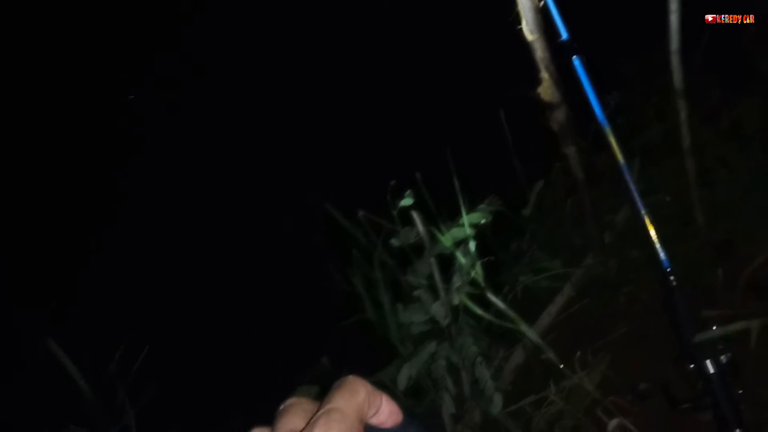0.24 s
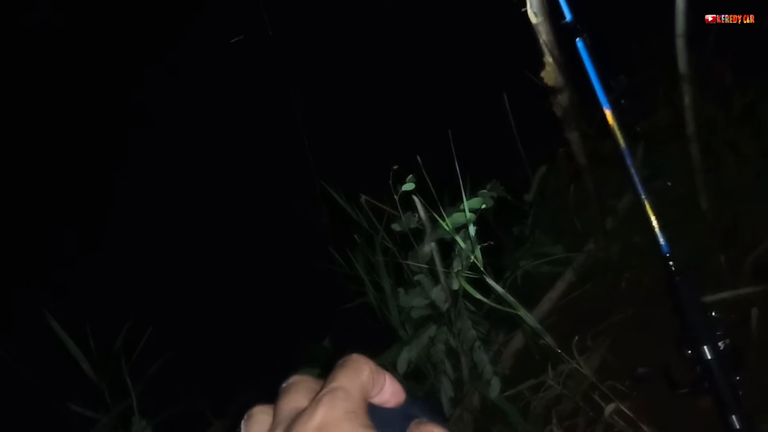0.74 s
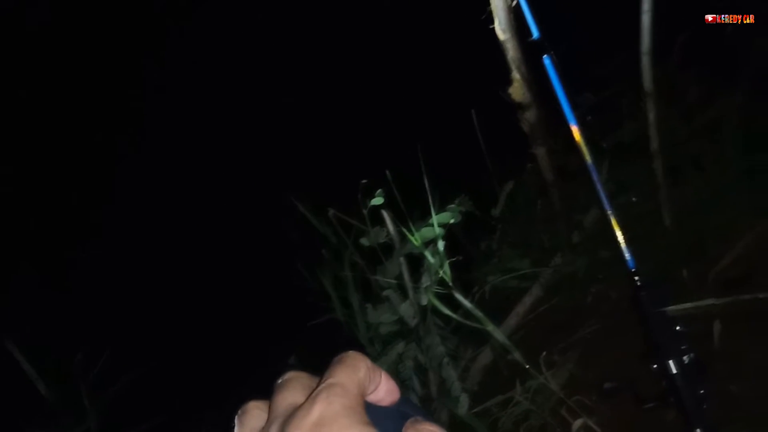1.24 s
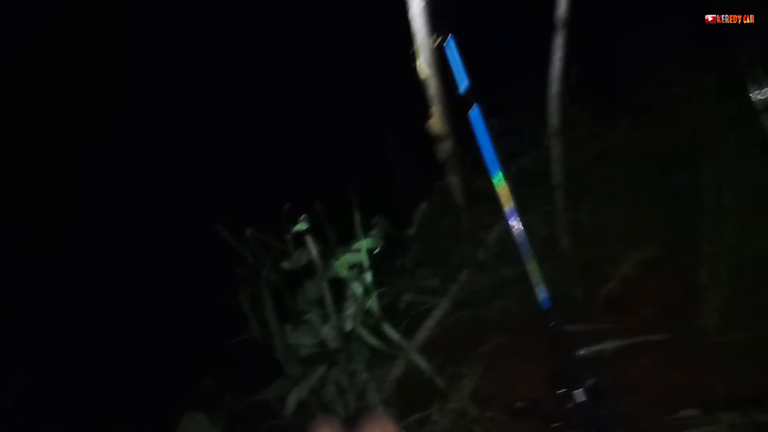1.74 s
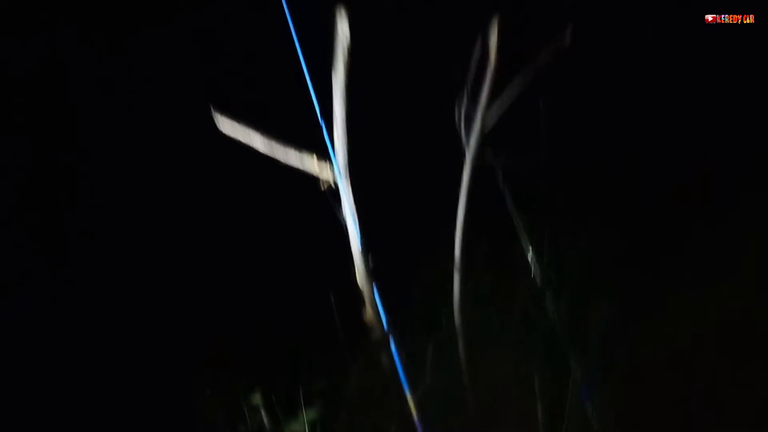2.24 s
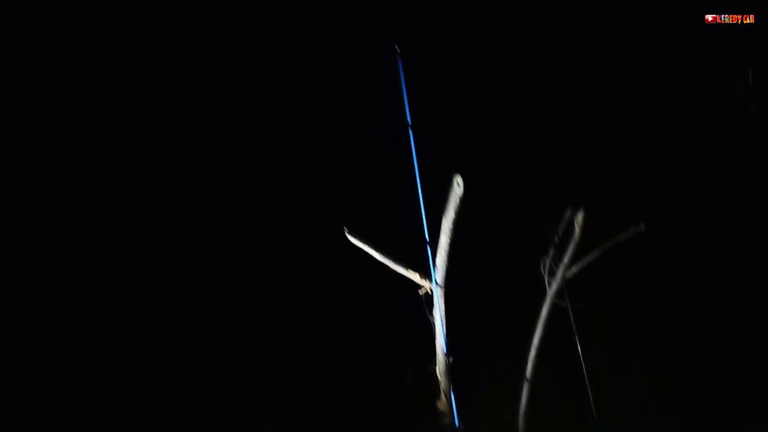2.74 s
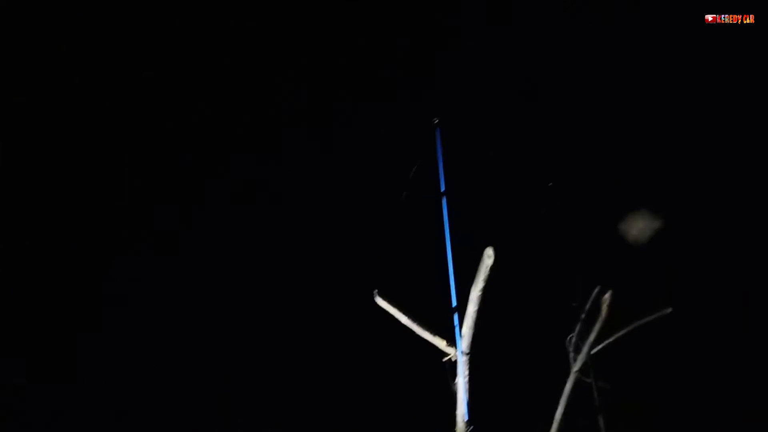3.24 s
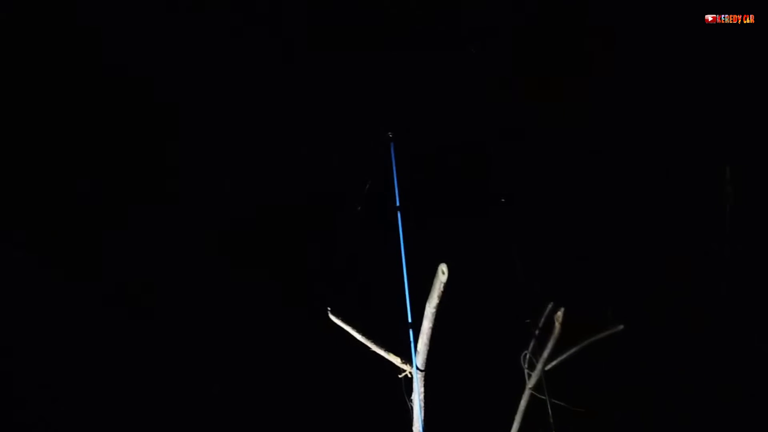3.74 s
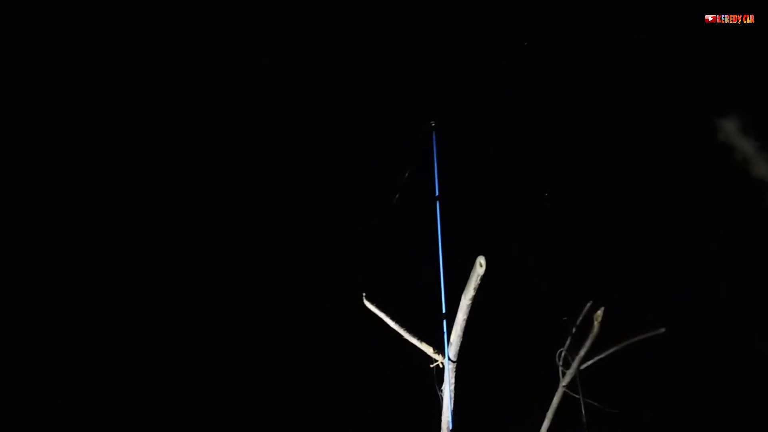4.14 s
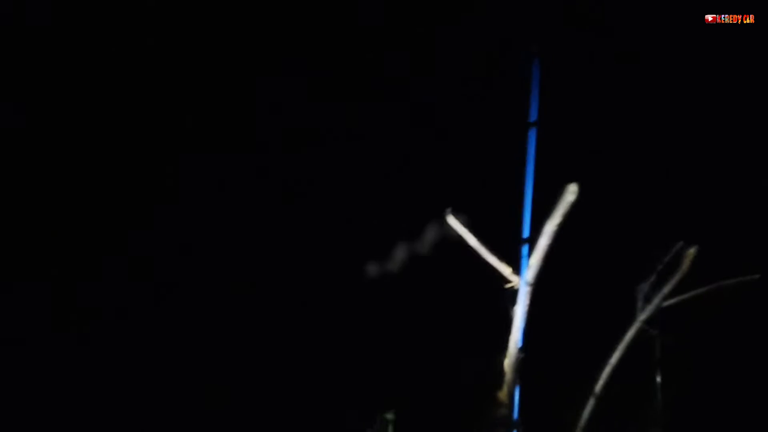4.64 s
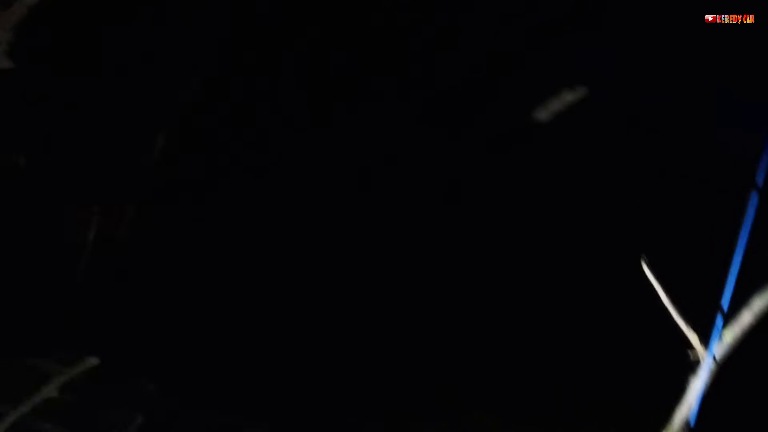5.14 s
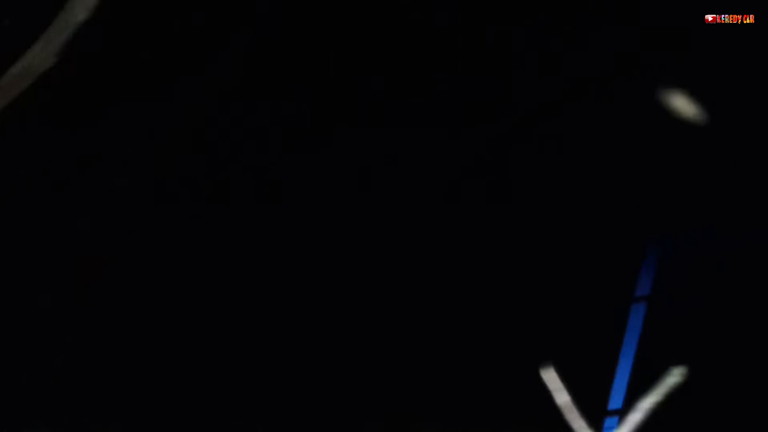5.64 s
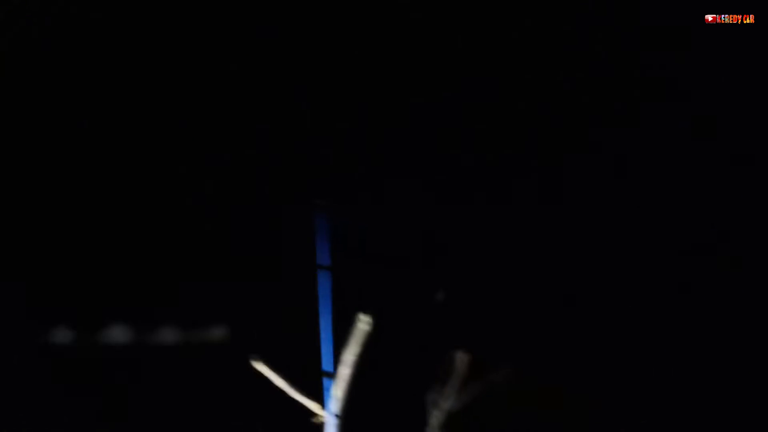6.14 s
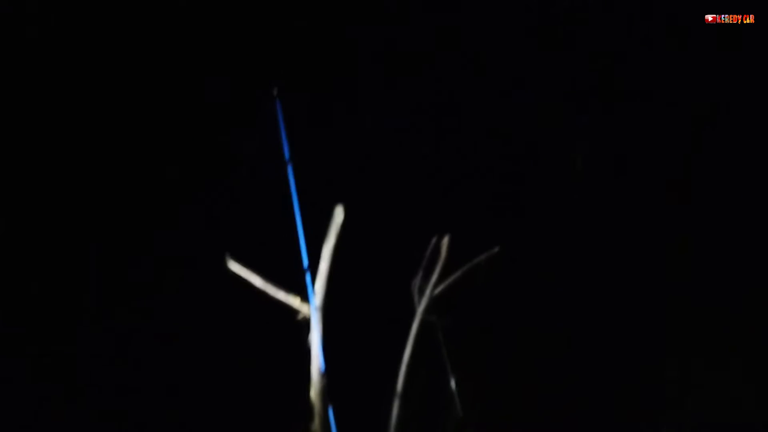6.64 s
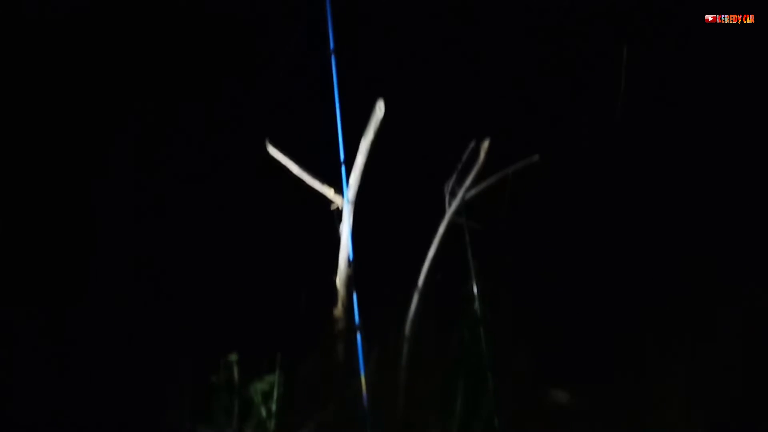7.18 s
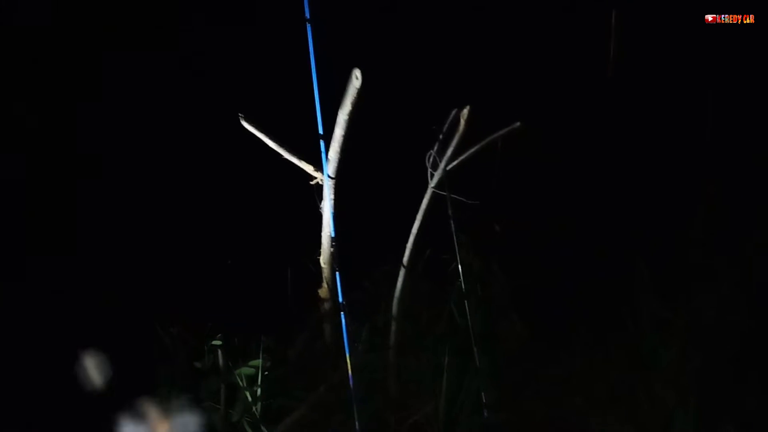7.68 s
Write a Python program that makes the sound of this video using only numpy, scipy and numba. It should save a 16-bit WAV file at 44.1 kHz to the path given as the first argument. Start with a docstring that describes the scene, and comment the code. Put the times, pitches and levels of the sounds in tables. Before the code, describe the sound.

A steady high insect chorus shimmers in the dark while one cricket trills fast; handled fishing gear clicks, rubs and thuds close to the microphone.

```python
"""Dense insect chorus on a riverbank at night; over it one tree cricket calls in two-stroke chirps.
Choirs are bands of noise throbbing at wing rate, swelling and fading as the listener turns the head.
The cricket is gliding sines with short bank echoes; a raspy neighbour is tooth strikes in a rising resonance.
Handling near the microphone: low bumps, noisy rubs, tonal squeaks, ringing clicks.
Rumble and hiss lie below; all is alike in both channels except one faint hiss."""
import sys
import numpy as np
from scipy import signal
from scipy.fft import rfft, irfft, next_fast_len
from scipy.io import wavfile
from numba import njit

SR = 44100
rng = np.random.default_rng(int(sys.argv[2]) if len(sys.argv) > 2 else 0)


def dump(signal):
    """Clip the signal to [-1, 1] and save it as 16-bit WAV at the path in sys.argv[1]."""
    limited = np.clip(np.atleast_2d(signal).T, -1, 1)
    pcm = np.round(limited * 32767).astype(np.int16)
    wavfile.write(sys.argv[1], SR, pcm)


N = 348831

# Choirs, low to high: (mean wing rate [1/s], throb depth [0-1], group flicker spread [dB])
CHOIR_WINGS = [(45, .2, 1.2), (47, .15, 1.5), (21.5, .25, 1.5), (120, .1, 1.6), (129, .2, 1.6),
               (326, .3, 1.6), (60, .05, 1.6)]
# Choir loudness, low to high: (facing level [dB], head-turned level [dB])
CHOIR_LEVELS = [(-82, -82.5), (-55, -64), (-58.5, -62.5), (-50.5, -55.5), (-55, -54.5), (-61, -65.5),
                (-79, -90)]
# Pitch borders of the choirs: (frequency [Hz])
CHOIR_BORDERS_HZ = [2000, 3600, 4500, 6100, 7200, 8400, 10800, 17000]
# Chorus spectrum before each choir is levelled: (frequency [Hz], relative density [dB])
CHORUS_SPECTRUM = [(2600, -57), (2850, -25), (3100, -27.5), (3650, -38.5), (3950, -11), (4250, -3),
                   (4600, -7), (5150, -13.5), (6150, -15.5), (6500, -5.5), (6850, 0), (7200, -5.5),
                   (8000, -9), (8700, -14.5), (9700, -16), (10800, -30.5), (13500, -52), (15000, -38),
                   (15450, -18.5), (15520, -68), (15900, -68)]
# Listener: (time [s], chorus swell [dB], head turn [0-1], change of the 8.4-10.8 kHz choir [dB])
LISTENER_MOVES = [(0, 0, 0.12, -1), (1.6, -1, 0.02, 0), (2.2, .5, 0, 0), (2.6, -1, 0, 1), (3.1, 1.5, 0, -1),
                  (3.9, -0.5, 0.06, 0.5), (4.8, 0.5, 0, -0.5), (5.3, 1.1, 0.1, -3), (5.4, -0.5, 0, -1.5),
                  (5.9, 1, 1, -3), (6.3, -0.5, 1, 2.5), (6.8, -1.5, 1, 3.5), (7.15, -1.5, 0.78, -3.5),
                  (7.91, -1.5, 0.8, -3)]
# Night rumble loudness: (time [s], median level [dB])
RUMBLE_LEVEL = [(0, -89), (.5, -84.5), (1.3, -90), (2.1, -85), (2.7, -90.5), (3.1, -84), (3.6, -89),
                (4.2, -85.5), (4.8, -88), (5.8, -87.5), (6.6, -83.5), (7.3, -83.5), (7.91, -84)]
# Rumble spectrum: (frequency [Hz], relative density [dB])
RUMBLE_SPECTRUM = [(12, -26), (20, 3), (27, -24), (47, -11.5), (64, -2), (200, -6.5), (260, -58),
                   (440, -120)]
# Microphone hiss spectrum: (frequency [Hz], relative density [dB])
HISS_SPECTRUM = [(120, -19), (200, -3.5), (350, -2.5), (460, -6.5), (800, -6.5), (1880, -9), (2500, -4),
                 (4000, -5), (15500, -12)]
# Spectrum of the hiss in opposite polarity: (frequency [Hz], relative density [dB])
OPPOSED_HISS_SPECTRUM = [(12, -37), (20, -13), (59, -1.5), (1130, -10), (2410, -7), (2690, -6), (3460, -14),
                         (3970, -25), (6030, -19), (6560, -51), (7750, -52), (8430, -19.5), (9960, 2.5),
                         (11400, -18), (15600, -8.5)]
# Tree cricket, runs of evenly spaced chirps: (first chirp [s], last chirp [s])
CRICKET_RUNS = [(0.005, 1.832), (1.898, 2.469), (2.552, 3.595), (3.665, 5.492), (5.55, 7.161),
                (7.211, 7.849)]
# Tree cricket loudness before stroke unevenness: (time [s], level [dB])
CRICKET_LEVEL = [(0, -65), (.45, -63), (1.0, -68), (1.4, -68), (1.6, -68.5), (1.8, -61), (2.0, -81),
                 (2.45, -70), (3.0, -67), (3.45, -71), (3.8, -78), (4.1, -76.5), (4.5, -68.5), (4.95, -93),
                 (5.2, -72), (5.5, -85), (5.6, -62), (5.92, -63), (6.1, -52), (6.95, -52.5), (7.2, -55.5),
                 (7.91, -54.5)]
# Echoes off the bank: (delay [s], gain [dB])
BANK_ECHOES = [(0.012, -15), (0.024, -18.5), (.041, -17.5), (.063, -35)]
# Bumps against the microphone body: (centre time [s], peak level [dB], frequency [Hz], bell length [cycles])
BUMP_EVENTS = [(0.359, -67.5, 230, 6.0), (0.566, -73.5, 395, 8.4), (1.7333, -38, 292, 1.42),
               (1.7329, -41, 520, 1.5), (1.741, -55.5, 150, 1.4), (2.097, -68, 110, 1.1),
               (2.179, -39, 550, 1.35), (2.183, -52.5, 139, 2.6), (2.222, -65, 142, 3.9),
               (5.904, -46, 97, 1.8), (5.935, -36.5, 96.4, 2.4), (5.956, -45, 140, 2.1),
               (5.979, -47.5, 132, 5.1), (5.999, -50, 85, 3.2), (6.017, -48.5, 122, 0.7),
               (6.04, -38, 94.6, 1.94), (6.068, -56, 85, 3.2), (6.103, -43, 89, 2.6), (6.14, -66, 70, 1.8),
               (6.483, -40.5, 125, 1.6), (6.488, -48, 238, 2.9), (6.4928, -30.5, 114, 1.36),
               (6.512, -38, 118, 2.1), (6.525, -42, 79, 2.1), (6.525, -59, 246, 3.2), (6.552, -58, 70, 2.2),
               (6.659, -57.5, 87, 3.0), (6.992, -72, 84.6, 2.5), (7.876, -62.5, 125, 3.6)]
# Creaks, squeaks and tinks of strap and gear: (middle [s], level [dB], mean frequency [Hz], length [s])
SQUEAK_EVENTS = [(1.73, -68, 3270, 0.022), (1.758, -68, 920, 0.048), (2.056, -54.5, 11700, .024),
                 (2.068, -48, 12480, 0.025), (2.12, -70, 1810, 0.05), (2.195, -59.5, 1030, 0.043),
                 (2.231, -64, 1475, .083), (2.273, -73, 1510, .051), (2.46, -67, 2210, .06),
                 (2.46, -74, 1710, .12), (2.7, -79.5, 1360, .2), (2.742, -70.5, 2060, 0.1),
                 (3.043, -71, 1915, .079), (3.097, -71, 1975, 0.09), (4.463, -64.5, 2017, .058),
                 (4.471, -69, 1070, .025), (4.555, -71, 770, .045), (4.67, -75.5, 1730, 0.11),
                 (4.799, -68, 2080, .04), (4.831, -61, 2200, .021), (4.833, -61, 2835, 0.043),
                 (4.83, -69, 3280, .04), (4.852, -64, 2165, .05), (5.186, -73, 1400, .042),
                 (5.472, -70, 2020, 0.049), (5.962, -72, 2190, 0.099), (7.49, -71, 1635, .039),
                 (7.746, -66, 14700, .02), (7.858, -70, 14700, .024), (7.864, -55, 9600, 0.018)]
# Sleeve and strap rubs: (start [s], length [s], body level [dB], low level [dB], top level [dB])
RUB_EVENTS = [(1.723, 0.057, -78, -63.5, -80), (1.77, .07, -79, -82, -85), (2.308, 0.22, -78, -82, -78),
              (2.599, .28, -80, -88.5, -84), (2.961, 0.19, -79, -85.5, -79), (4.408, 0.31, -81.5, -89, -84),
              (4.754, .22, -75.5, -80, -86), (5.096, .2, -78.5, -82.5, -88), (5.416, .12, -84, -92, -79),
              (5.897, .25, -79.5, -79, -89), (6.284, 0.19, -80.5, -80, -84), (7.725, 0.053, -88, -81, -79),
              (7.838, 0.071, -81, -86, -77)]
# Long scrape around the loudest click: (time [s], body level [dB], low level [dB], top level [dB])
SCRAPE_LEVELS = [(2.04, -75, -93, -76), (2.06, -78, -82, -65), (2.12, -70, -79, -63),
                 (2.155, -55, -60, -62), (2.175, -49.5, -60, -61), (2.2, -60, -67, -61),
                 (2.23, -64, -70, -66), (2.275, -68.5, -75.5, -63)]
# Brighter cloth swishes: (start [s], length [s], level [dB])
SWISH_EVENTS = [(2.123, .14, -58.5), (6.297, .12, -59.5)]
# Dry gear clicks: (time [s], level [dB], ring frequency [Hz], ring t60 [s], crack re level [dB])
CLICK_EVENTS = [(2.1785, -38.5, 1790, 0.022, -2), (2.2, -45, 1370, 0.016, -9),
                (2.2205, -62, 1600, .011, -3), (4.473, -52, 2000, 0.013, -35),
                (4.813, -42.5, 2300, 0.0087, -27), (5.1738, -48.5, 2010, 0.026, -32)]
# Calls of the raspy neighbour: (start [s], length [s], mid-call level [dB])
RASP_CALLS = [(6.239, .2, -69), (6.46, 0.21, -66.5), (6.777, 0.22, -69), (6.996, .11, -74),
              (7.206, 0.068, -75), (7.417, .19, -72), (7.64, .12, -70), (7.78, 0.14, -71)]

BAND_PER_GROUP_HZ, OVERLAP_HZ = 130.3, 250
CRICKET_HZ, CRICKET_FALL_HZ = 2694, 34.4
CHIRP_PERIOD_S, STROKE_S, STROKE_GAP_S = .0702, .023, .025
# strokes grow uneven below the clear level
CLEAR_DB, UNEVEN_DB, UNEVEN_DB_PER_DB = -55, 1.23, .1347
FAR_CRICKETS_DB, FAR_POLE_WIDTH_HZ = -85, 90
HISS_DB, OPPOSED_HISS_DB = -75.5, -82
RASP_START_HZ, RASP_RISE_HZ_PER_S, TEETH_PER_S = 2833, 1000, 600
RUB_ATTACK_S, RUB_RELEASE_S, RUB_UNEVEN_DB, FIBRES_PER_S = .02, .04, 2, 7000
GLIDE_SHARE = .032  # largest offset of squeak pitch at either end
# faint creaks with each rub
FAINT_PER_RUB, FAINT_RE_BODY_DB, FAINT_MEAN_S = 3, 2, .06
FAINT_LOW_HZ, FAINT_HIGH_HZ = 1205, 2315
STOPBAND_HZ = 15700


def from_db(db):
    """Decibels to gain."""
    return 10 ** (np.asarray(db) / 20)


def rms_one(x):
    """Scale to unit rms."""
    return x / np.sqrt(np.mean(x ** 2) + 1e-30)


def in_time(rows):
    """Interpolate the columns of a time table at every sample."""
    time_s, *columns = np.transpose(rows)
    return [np.interp(np.arange(N) / SR, time_s, column) for column in columns]


def colour(points, size):
    """Gain on an FFT grid, log in frequency; -200 dB outside the table."""
    hz, db = np.transpose(points)
    grid_hz = np.arange(size // 2 + 1) * SR / size
    return from_db(np.interp(np.log(grid_hz + 1), np.log(hz), db, left=-200, right=-200))


def drift(pole_hz):
    """Slow random curve of unit rms: noise through a double one-pole low-pass."""
    step = 40  # samples per drawn value
    r = np.exp(-2 * np.pi * pole_hz * step / SR)
    draws = rng.standard_normal(N // step + 2002)
    slow = rms_one(signal.lfilter([1], [1, -2 * r, r * r], draws)[2000:])  # settled part
    return np.interp(np.arange(N) / step, np.arange(len(slow)), slow)


def noise(points):
    """Steady noise of a given spectrum, unit rms."""
    size = next_fast_len(N)
    spectrum = rfft(rng.standard_normal(size)) * colour(points, size)
    return rms_one(irfft(spectrum, size)[:N])


def band(low_hz, high_hz, x):
    """Band-pass to unit rms."""
    sos = signal.butter(2, [low_hz, high_hz], "band", fs=SR, output="sos")
    return rms_one(signal.sosfilt(sos, x))


def add(out, start_s, sound):
    """Mix in a sound, trimmed to the ends of the output."""
    i = round(start_s * SR)
    sound = sound[max(-i, 0):N - i]
    out[max(i, 0):max(i, 0) + len(sound)] += sound


@njit
def moving_resonance(x, hz, r, sr):
    """Two-pole resonance with moving centre."""
    y = np.zeros(len(x))
    for i in range(2, len(x)):
        y[i] = x[i] + 2 * r * np.cos(2 * np.pi * hz[i] / sr) * y[i - 1] - r * r * y[i - 2]
    return y


def resonance(x, hz, pole_width_hz):
    """Two moving resonances in series, unit rms."""
    r = np.exp(-np.pi * pole_width_hz / SR)
    once = moving_resonance(x, hz, r, float(SR))
    return rms_one(moving_resonance(once, hz, r, float(SR)))


def choir(song, low_hz, high_hz, wing_per_s, depth, flicker_db, groups=6):
    """Narrow bands side by side; interleaved groups flicker separately, all throb at the wing rate."""
    size = 2 * (len(song) - 1)
    hz = np.arange(len(song)) * SR / size
    rise, fall = [np.clip((hz - edge) / (2 * OVERLAP_HZ) + .5, 0, 1) for edge in (low_hz, high_hz)]
    share = song * np.sqrt(rise * (1 - fall))
    group = (hz // BAND_PER_GROUP_HZ) % groups
    phase = 2 * np.pi * wing_per_s * np.cumsum(1 + .0196 * drift(.504)) / SR
    crowd = np.zeros(N)
    for k in range(groups):
        voices = irfft(share * (group == k), size)[:N]
        crowd += from_db(flicker_db * drift(8.5)) * voices
    return rms_one(crowd * (1 + np.clip(depth, 0, 1) * np.sin(phase)))


def chorus():
    """Choirs of one song colour swell together and change unequally as the head turns."""
    size, out = 2 * next_fast_len(N // 2 + 1), np.zeros(N)
    swell_db, turn, treble_db = in_time(LISTENER_MOVES)
    turn = np.clip(turn, 0, 1)
    for k, (facing_db, turned_db) in enumerate(CHOIR_LEVELS):
        level_db = facing_db + swell_db + turn * (turned_db - facing_db)
        if k == 5:
            level_db = level_db + treble_db
        song = rfft(rng.standard_normal(size)) * colour(CHORUS_SPECTRUM, size)
        out += from_db(level_db) * choir(song, *CHOIR_BORDERS_HZ[k:k + 2], *CHOIR_WINGS[k])
    return out


def far_crickets():
    """Distant chirps merged: resonant noise, narrow and wavering, at the cricket's pitch."""
    tone = resonance(rng.standard_normal(N), np.full(N, float(CRICKET_HZ)), FAR_POLE_WIDTH_HZ)
    return from_db(FAR_CRICKETS_DB + 4.4 * drift(2.2)) * tone


def night_rumble():
    """Low coloured noise, wavering about a slow level curve."""
    level_db, = in_time(RUMBLE_LEVEL)
    return from_db(level_db + 2.1 * drift(2.48)) * noise(RUMBLE_SPECTRUM)


def microphone_hiss():
    """Coloured noise with slight level drift, common to both channels."""
    return from_db(HISS_DB + 1.0 * drift(11)) * noise(HISS_SPECTRUM)


def opposed_hiss():
    """Steady coloured noise, opposite in polarity between channels."""
    return from_db(OPPOSED_HISS_DB) * noise(OPPOSED_HISS_SPECTRUM) * [[1], [-1]]


def cricket():
    """Each wing stroke is a near sine sinking in pitch; the bank returns short echoes."""
    out, t = np.zeros(N), np.arange(round(STROKE_S * SR)) / SR
    runs = [np.linspace(a, b, round((b - a) / CHIRP_PERIOD_S) + 1) for a, b in CRICKET_RUNS]
    starts_s = np.concatenate(runs)
    cut_short = np.diff(starts_s, append=np.inf) < .8 * CHIRP_PERIOD_S  # one stroke only
    envelope = np.sin(np.pi * t / STROKE_S) ** .96
    for start_s, cut in zip(starts_s, cut_short):
        level_db = np.interp(start_s, *np.transpose(CRICKET_LEVEL))
        uneven_db = UNEVEN_DB + UNEVEN_DB_PER_DB * max(CLEAR_DB - level_db, 0)
        for k in range(2 - cut):
            pitch_luck, phase_luck, level_luck = rng.standard_normal(3)
            hz = CRICKET_HZ + 8 * pitch_luck - CRICKET_FALL_HZ * (t / STROKE_S - .5)
            tone = np.sin(2 * np.pi * np.cumsum(hz) / SR + 3 * phase_luck)
            gain = from_db(level_db + uneven_db * level_luck)
            add(out, start_s + k * STROKE_GAP_S - STROKE_S / 2, gain * envelope * tone)
    wet = out.copy()
    for delay_s, gain_db in BANK_ECHOES:
        add(wet, delay_s, from_db(gain_db) * out)
    return wet


def bumps():
    """Soft push on the microphone body: low cycles under a bell-shaped envelope."""
    out = np.zeros(N)
    for centre_s, peak_db, hz, cycles in BUMP_EVENTS:
        half = round(cycles / hz * SR)
        t = np.arange(-half, half) / SR
        bell = np.exp(-(2.35 * t * hz / cycles) ** 2)
        add(out, centre_s + t[0], -from_db(peak_db) * bell * np.cos(2 * np.pi * hz * t))
    return out


def faint_creaks():
    """Draw random small creaks within each rub, as squeak rows."""
    rows = []
    for start_s, length_s, body_db, *_ in RUB_EVENTS:
        for when, pitch, span in rng.random((FAINT_PER_RUB, 3)):
            hz = FAINT_LOW_HZ + pitch * (FAINT_HIGH_HZ - FAINT_LOW_HZ)
            middle_s = start_s + when * length_s
            rows.append((middle_s, body_db + FAINT_RE_BODY_DB, hz, FAINT_MEAN_S * (.5 + span)))
    return rows


def squeaks():
    """Stick and slip: short gliding tones mixed with narrow noise around the same pitch."""
    out, size = np.zeros(N), round(.2 * SR)
    rows = list(SQUEAK_EVENTS) + faint_creaks()
    low_pass = signal.butter(2, 110, fs=SR, output="sos")
    slow = rms_one(signal.sosfilt(low_pass, rng.standard_normal((len(rows), 2, 2 * size))))
    slides = rng.uniform(-GLIDE_SHARE, GLIDE_SHARE, len(rows))
    for (middle_s, level_db, hz, length_s), (a, b), slide in zip(rows, slow[..., size:], slides):
        n = min(round(length_s * SR), size)
        phase = 2 * np.pi * np.cumsum(hz * np.linspace(1 - slide, 1 + slide, n)) / SR
        rough = a[:n] * np.sin(phase) + b[:n] * np.cos(phase)
        sound = .6 * np.sin(phase) + .5 * rough
        add(out, middle_s - length_s / 2, from_db(level_db) * np.hanning(n) ** .7 * sound)
    return out


def stroke(start_s, length_s):
    """Envelope of one rub: rise, hold, fall."""
    t = np.arange(N) / SR
    rise = (t - start_s) / RUB_ATTACK_S
    fall = (start_s + length_s - t) / RUB_RELEASE_S
    return np.clip(np.minimum(rise, fall), 0, 1)


def rubbing():
    """Fibres slip at random, heard as broad body, dull low part and hissing top; swishes lie between."""
    before = (SCRAPE_LEVELS[0][0] - .01, -120, -120, -120)
    after = (SCRAPE_LEVELS[-1][0] + .01, -120, -120, -120)
    gains = from_db(in_time([before, *SCRAPE_LEVELS, after]))
    uneven = from_db(RUB_UNEVEN_DB * np.array([drift(19) for _ in gains]))
    for start_s, length_s, *levels_db in RUB_EVENTS:
        gains = gains + from_db(levels_db)[:, None] * stroke(start_s, length_s) * uneven
    slips = (rng.random(N) < FIBRES_PER_S / SR) * rng.laplace(0, 1, N)
    body, low, top = band(960, 3670, slips), band(180, 1140, slips), band(8700, 14000, slips)
    swish_gain = sum(from_db(db) * stroke(start_s, length_s) for start_s, length_s, db in SWISH_EVENTS)
    swish = swish_gain * band(4200, 6300, slips)
    return swish + gains[0] * body + gains[1] * low + gains[2] * top


def clicks():
    """Sharp crack plus a brief ring of the struck part."""
    out, t = np.zeros(N), np.arange(round(.05 * SR)) / SR
    crack = (1 - t / .0002) * np.exp(-t / .0002)  # push and slower rebound
    onset = 1 - np.exp(-t / .00062)  # contact is not instant
    for time_s, level_db, hz, t60_s, crack_db in CLICK_EVENTS:
        ring = np.sin(2 * np.pi * hz * t) * from_db(-60 * t / t60_s) * onset
        add(out, time_s, from_db(level_db) * (ring + from_db(crack_db) * crack))
    return out


def rasp():
    """Uneven tooth strikes ring a wing resonance that rises through each call."""
    gain, rise_hz = np.zeros(N), np.zeros(N)
    for start_s, length_s, level_db in RASP_CALLS:
        t = np.arange(round(length_s * SR)) / SR
        add(gain, start_s, from_db(level_db) * np.sin(np.pi * t / length_s))
        add(rise_hz, start_s, RASP_RISE_HZ_PER_S * t)
    teeth = (rng.random(N) < TEETH_PER_S / SR) * rng.standard_normal(N)
    return gain * resonance(teeth, RASP_START_HZ + rise_hz, pole_width_hz=160)


def scene():
    """Sum all sources alike in both channels, then add the opposed hiss."""
    insects = chorus() + far_crickets() + cricket() + rasp()
    handling = bumps() + squeaks() + rubbing() + clicks()
    air = night_rumble() + microphone_hiss()
    return insects + handling + air + opposed_hiss()


def record(dry):
    """Steep low-pass, 60 dB down from the stopband edge."""
    return signal.sosfilt(signal.cheby2(24, 60, STOPBAND_HZ, fs=SR, output="sos"), dry)


dry = scene()
out = record(dry)
dump(out)
```